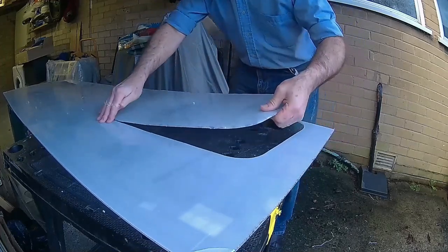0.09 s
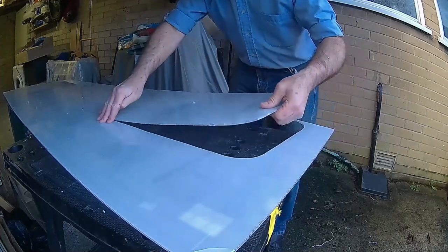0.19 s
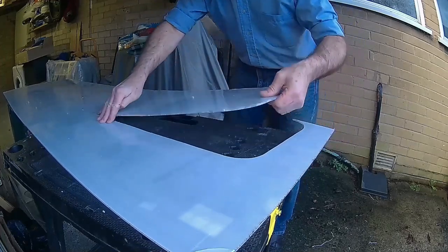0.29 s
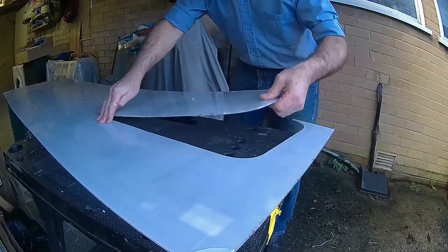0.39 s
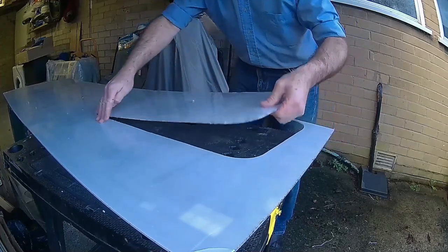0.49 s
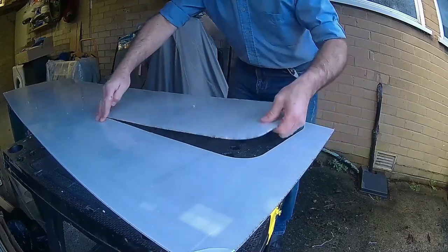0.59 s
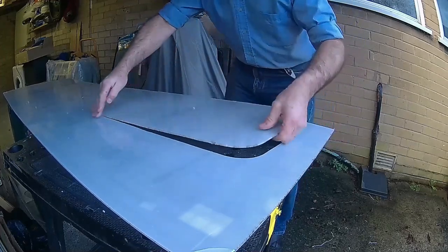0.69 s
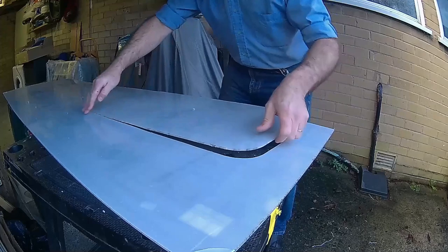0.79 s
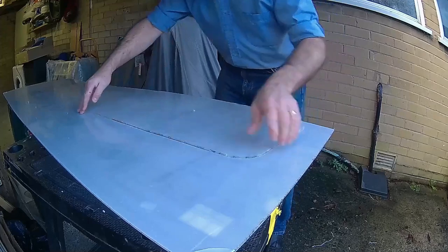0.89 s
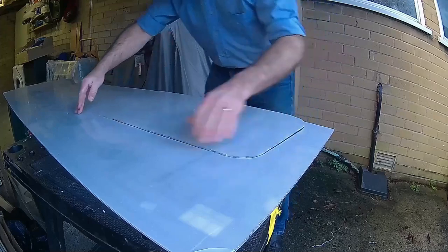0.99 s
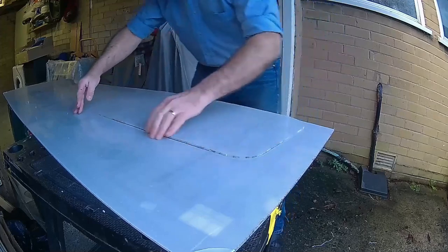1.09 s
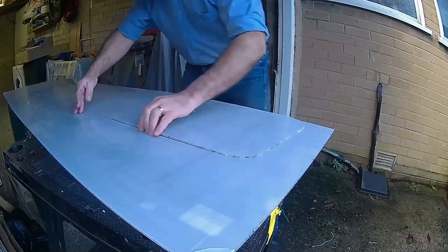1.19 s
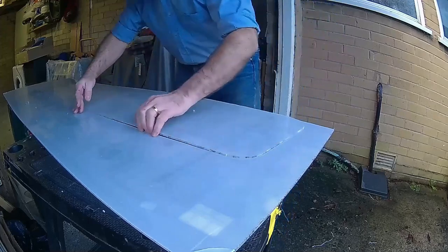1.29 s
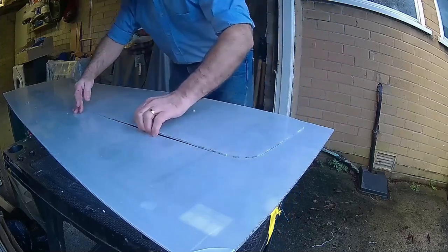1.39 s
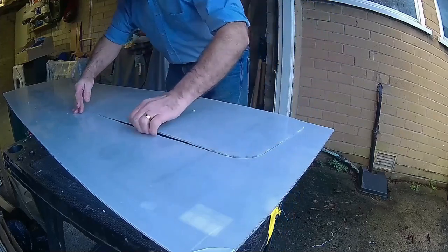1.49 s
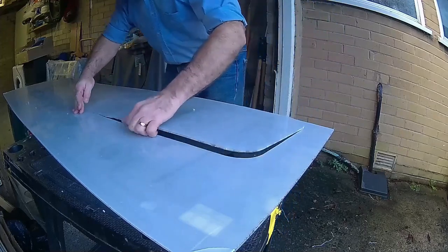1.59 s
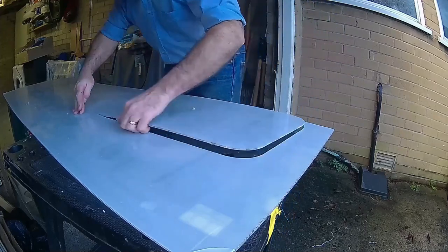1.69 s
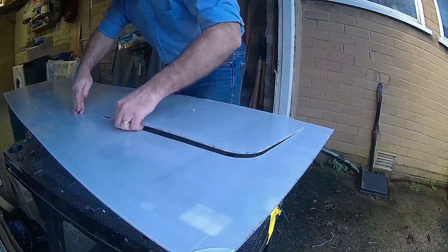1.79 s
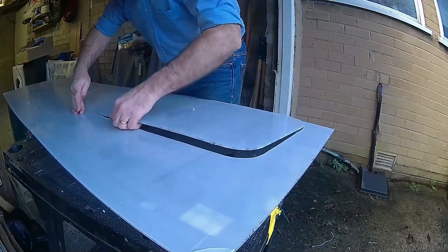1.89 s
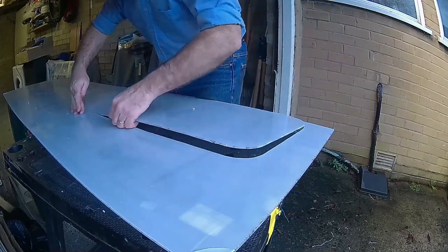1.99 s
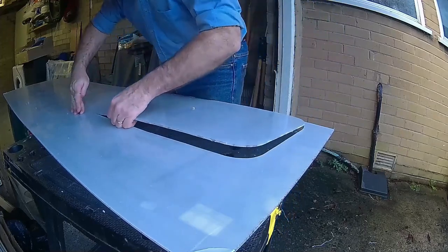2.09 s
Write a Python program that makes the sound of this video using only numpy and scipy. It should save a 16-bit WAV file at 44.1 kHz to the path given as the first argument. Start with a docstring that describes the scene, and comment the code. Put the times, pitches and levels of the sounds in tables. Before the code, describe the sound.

A stiff plastic sheet is flexed on a workbench in a walled yard. After near-quiet, a very loud, sharp crackling snap with hollow knocks bursts at 0.2 s, echoing briefly. Tiny ticks come near 0.57 s, a duller double knock at 0.9 s, weak knocks around 1.04 s, a small click at 1.5 s, then faint taps and rubbing, strongest around 1.63 s, over soft distant traffic and hiss.

```python
"""Plastic sheet flexed by hand on a workbench in a walled yard until its fused cut lets go.
Knocks: rattling contacts drive the sheet's dull modes. Cracks: showers of coloured splinter clicks.
Rubbing: friction clicks ring the sheet and scratch it. Bending: faint narrow-band hums.
The walls return a short tail of sparse echoes; distant traffic and hiss are patchy shaped noise.
The sound is nearly mono, with a faint random-phase side signal."""
import sys
import numpy as np
from scipy import signal
from scipy.io import wavfile
from scipy.ndimage import uniform_filter1d

SR = 44100
rng = np.random.default_rng(int(sys.argv[2]) if len(sys.argv) > 2 else 0)


def store_pcm(level_fs):
    """Save levels as 16-bit WAV."""
    pcm = np.round(np.clip(level_fs, -1, 1) * 32767).astype(np.int16)
    wavfile.write(sys.argv[1], SR, np.atleast_2d(pcm).T)


def gain_from_decibels(decibels):
    """Convert decibel values to linear amplitude factors."""
    exponent = np.asarray(decibels, float) / 20
    return 10 ** exponent


N = 94815  # 2.15 s

# rubbing by fingers and edges: t/s, rms in the sheet/dB, rms of the scratch/dB
RUBBING = [(0, -61.5, -78), (0.102, -72, -90), (0.502, -68, -80.5), (.56, -59, -69.5), (0.628, -71.5, -86),
           (0.761, -63, -78), (0.861, -66, -68.5), (1.0, -56.5, -80), (1.2, -64, -67), (1.3, -66.5, -86),
           (1.575, -73.5, -71), (1.63, -45.5, -66), (1.67, -56.5, -78), (1.72, -51.5, -65),
           (1.82, -58.5, -75), (1.872, -67.5, -72.5), (1.961, -52, -74), (2.15, -68.5, -94.5)]
# sheet modes: f/Hz, relative level/dB, t60/s
SHEET_MODES = [(93, -4, .15), (151, -42, .12), (240, 0, .08), (290, -6, .06), (384, 2.5, 0.072),
               (472.3, 1, .05), (560, -23, 0.036), (600, 8, 0.047), (657, 2.5, 0.028), (749, 14, 0.017),
               (860, 4, 0.04), (986.5, 14, 0.015), (1046, 2, 0.049), (1100, 11.5, 0.017), (1256, 15, 0.016),
               (1422, 10, .03), (1813, -6.5, 0.019), (2160, -18, .03), (2670, -17, .04), (2990, -17, 0.048),
               (3150, -20, .03)]
# distant traffic and hiss, relative density: f/Hz, level per Hz/dB
TRAFFIC_COLOUR = [(20, -9.5), (60, -4.5), (200, -0.5), (400, -3.5), (700, -4), (1100, -2.5), (1400, -20),
                  (1900, -25), (3000, -24), (5000, -26), (7300, -29.5), (8000, -20.5), (8600, -25.5),
                  (10000, -30), (12000, -35.5), (14000, -35.5), (16000, -50.5)]
# knocks of the sheet: t/s, level before KNOCK_DB/dB, ring centre f/Hz, contact decay constant/s
KNOCKS = [(.001, -38, 700, 0.0044), (.014, -38, 600, 0.0027), (.2015, -5, 980, 0.0031),
          (.207, -4, 653, 0.0057), (.215, -16.5, 533, 0.0078), (.2265, -13, 970, 0.0046),
          (.24, -13, 600, 0.0071), (.261, -41, 810, 0.0048), (.567, -43.5, 600, 0.011),
          (.586, -44.5, 860, 0.0034), (.764, -41.5, 820, .004), (.776, -62, 900, 0.0042),
          (.892, -12.5, 631, 0.002), (.906, -15.5, 630, 0.0068), (.924, -29, 895, 0.011),
          (.94, -41.5, 100, 0.0038), (.896, -23, 277, 0.0058), (.93, -24.5, 303, 0.011),
          (.21, -18.5, 305, 0.0036), (1.039, -32, 221, 0.0023), (1.092, -50, 110, 0.0059),
          (1.506, -40.5, 263, 0.014), (1.795, -40, 290, 0.007), (1.7815, -43.5, 2970, 0.0046),
          (1.5024, -40.5, 2880, 0.0048), (1.69, -44, 1810, 0.0097), (.896, -41.5, 2300, 0.0027),
          (1.025, -46, 2300, 0.0042), (1.043, -39, 2000, 0.0032), (.968, -30.5, 760, 0.0023),
          (1.037, -23, 600, 0.0034), (1.045, -28.5, 900, 0.0013), (1.063, -49, 560, 0.0059),
          (1.16, -39, 569, 0.0041), (1.183, -39, 1050, 0.0023), (1.195, -66, 1100, .006),
          (1.327, -40, 600, .003), (1.502, -24.5, 702, 0.0043), (1.518, -30.5, 710, 0.0027),
          (1.528, -57, 720, 0.0018), (1.586, -36.5, 400, 0.0053), (1.594, -32.5, 870, 0.0069),
          (1.607, -35, 687, 0.0072), (1.683, -43, 1300, 0.0092), (1.707, -41, 950, .005),
          (1.781, -35.5, 1100, 0.0034), (1.81, -44.5, 418, 0.0067), (1.915, -39, 540, 0.012),
          (2.067, -38.5, 716, 0.0018)]
# cracks along the cut: t/s, level before CRACK_DB/dB, brightness/0-1, decay constant/s
CRACKS = [(.001, -55, 0.86, 0.016), (0.2013, -10, 0.84, 0.0041), (0.2064, -11, 0.8, 0.012),
          (0.2258, -15, 0.71, 0.0023), (0.237, -44, .8, .004), (0.568, -52.5, .9, 0.0025),
          (0.584, -49, 0.85, 0.0027), (.648, -62, 0.85, 0.0033), (.89, -40.5, 0.47, 0.0047),
          (0.894, -29, .2, 0.0062), (0.908, -42, 0.44, 0.0035), (0.922, -42, 0.37, 0.0079),
          (.968, -41, .2, 0.013), (1.0232, -42, 0, 0.01), (1.046, -38, 0.07, 0.0038),
          (1.1835, -51, 0.07, 0.021), (1.256, -53.5, .05, 0.003), (1.331, -47, 0.5, 0.0034),
          (1.502, -32.5, 0.67, 0.0048), (1.514, -62, .6, 0.0033), (1.53, -64, 0.7, .003),
          (1.605, -45.5, 0.15, 0.031), (1.682, -44, 0.2, .008), (1.745, -48.5, .05, .005),
          (1.7814, -35.5, 0, 0.0058), (2.033, -48, 0.87, 0.0034)]
# dull crack and scratch, relative colour: f/Hz, level per Hz/dB
DULL_COLOUR = [(900, -37.5), (1500, -0.5), (2200, -3.5), (2850, 0), (3400, -12), (5000, -17), (7000, -29.5),
               (10000, -33), (12000, -53.5), (16000, -74)]
# bright crack, relative colour: f/Hz, level per Hz/dB
BRIGHT_COLOUR = [(880, 8), (1500, -9), (1830, -10), (2320, -11), (3380, -7.5), (3550, -14), (5070, -8.5),
                 (9100, -4), (13100, -24.5), (16000, -27)]
# yard decay, apart from the early boost: f/Hz, t60/s
YARD_DECAY = [(150, 0.26), (500, 0.15), (1200, 0.26), (3000, 0.22), (8000, 0.2), (12000, 0.16)]
# hums of the bent sheet: t/s, length/s, f/Hz, rms before the swell/dB
HUMS = [(1.08, 0.23, 232, -63.5), (1.54, 0.26, 155, -64.5), (1.928, 0.088, 425, -54)]
# side/mid gain, before frames overlap: f/Hz, level/dB
SIDE_GAIN = [(60, -32.5), (250, -34.5), (600, -34.5), (1500, -22), (3000, -15), (8000, -12.5),
             (15000, -28.5)]

SOFT_S, RADIATE_HZ = 0.00056, (94.4, 3800)  # softness of a tap, radiated band
RUB_PER_S, RUB_SPREAD_DB, RUB_HZ, RUB_OCT = 2200, 2.5, 600, 1.18  # clicks; centre and reach of the ring
TRAFFIC_DB, PATCH_DB = -60.5, 1.2  # overall rms; standard deviation of the patches
KNOCK_DB, KNOCK_RISE_S = -6, 0.0019
RING_OCT, RING_FLOOR_DB, SPOT_DB = 0.56, -35, 1.5  # reach around the centre, its floor, spread by spot
CRACK_DB, CRACK_RISE_S, DULL_BELOW_HZ = -5, 0.00056, 900
SPLINTERS_PER_S, SPLINTER_SPREAD_DB = 12000, 1.5
YARD_KNOCK_DB, YARD_CRACK_DB, YARD_GAP_S = -5.5, -3.5, 0.004
EARLY_DB, EARLY_S = 6.5, 0.041  # near walls strengthen the first echoes
HUM_POLE_HZ = 8.9  # bandwidth of each of two poles
EDGE_HZ = 16300


def evened(x):
    """Scales to rms 1."""
    return x / np.sqrt(np.mean(x ** 2) + 1e-20)


def read(points, hz):
    """Interpolates a table on a log-frequency axis."""
    f, value = np.transpose(points)
    return np.interp(np.log(hz + 1), np.log(f + 1), value)


def add(mix, at_s, sound):
    """Mixes a sound in at a time."""
    part = mix[round(at_s * SR):][:len(sound)]
    part += sound[:len(part)]


def levelled(sound, db, window):
    """Sets the loudest short-term rms to 3 dB below db."""
    loudest = uniform_filter1d(sound ** 2, window).max()
    return gain_from_decibels(db) * sound / np.sqrt(2 * loudest)


def clicks(per_s, spread_db, size):
    """Sparse clicks of random sign; a few are large."""
    happens = rng.random(size) < per_s / SR
    excess = np.minimum(rng.exponential(1, size), 4)
    sign = rng.choice([-1., 1.], size)
    return happens * sign * gain_from_decibels(spread_db * excess)


def kernel(db):
    """Minimum-phase response of energy 1 for a gain on 1025 bins."""
    mirrored_db = np.r_[db, db[-2:0:-1]]
    log_gain = np.log(gain_from_decibels(np.maximum(mirrored_db, -100)))
    h = np.fft.ifft(np.exp(np.conj(signal.hilbert(log_gain)))).real[:1024]
    return h / np.linalg.norm(h)


def ring(weight_db):
    """Decaying sheet modes of random phase, softened at onset and limited to the radiated band."""
    t = np.arange(6000) / SR
    hz, db, t60_s = np.transpose(SHEET_MODES)[:, :, None]
    decay = gain_from_decibels(db + weight_db[:, None] - 60 * t / t60_s)
    modes = decay * np.sin(2 * np.pi * (hz * t + rng.random(hz.shape)))
    soft_onset = 1 - np.exp(-(t / SOFT_S) ** 2)
    band = signal.butter(2, RADIATE_HZ, "bandpass", fs=SR, output="sos")
    return signal.sosfilt(band, modes.sum(0) * soft_onset)


def rubbing():
    """Friction clicks ring the sheet through four random responses and scratch its surface."""
    at_s, ring_db, scratch_db = np.transpose(RUBBING)
    t, hz = np.arange(N) / SR, np.fft.rfftfreq(2048, 1 / SR)
    weight_db = -6 * (np.log2(np.transpose(SHEET_MODES)[0] / RUB_HZ) / RUB_OCT) ** 2
    grit = clicks(RUB_PER_S, RUB_SPREAD_DB, size=(5, N))
    ringing = evened(sum(signal.fftconvolve(g, ring(weight_db))[:N] for g in grit[1:]))
    scratch = evened(signal.fftconvolve(grit[0], kernel(read(DULL_COLOUR, hz)))[:N])
    return ringing * gain_from_decibels(np.interp(t, at_s, ring_db)) + scratch * gain_from_decibels(np.interp(t, at_s, scratch_db))


def traffic():
    """Distant road noise and microphone hiss: shaped noise, patchy in time and frequency."""
    frames, hz = N // 256 + 5, np.fft.rfftfreq(1024, 1 / SR)
    real, imag, patches = rng.standard_normal((frames, 513, 3)).T
    patches = evened(uniform_filter1d(uniform_filter1d(patches, 10, 0), 10, 1))
    gain_db = read(TRAFFIC_COLOUR, hz)[:, None] + PATCH_DB * patches
    spectrum = (real + 1j * imag) * gain_from_decibels(gain_db)
    noise = signal.istft(spectrum, nperseg=1024, noverlap=768)[1][:N]
    return gain_from_decibels(TRAFFIC_DB) * evened(noise)


def knocks():
    """A short rattling contact drives the modes, most of all those near the knock's centre."""
    out, hz, t = np.zeros(N), np.transpose(SHEET_MODES)[0], np.arange(2000) / SR
    for at_s, db, centre_hz, decay_s in KNOCKS:
        weight_db = np.maximum(-6 * (np.log2(hz / centre_hz) / RING_OCT) ** 2, RING_FLOOR_DB)
        weight_db = weight_db + SPOT_DB * rng.standard_normal(len(hz))
        envelope = np.exp(-t / decay_s) * np.minimum(t / KNOCK_RISE_S, 1)
        contact = rng.standard_normal(len(t)) * envelope
        sound = signal.fftconvolve(contact, ring(weight_db))
        add(out, at_s, levelled(sound, db + KNOCK_DB, 200))
    return out


def cracks():
    """A dying shower of splinter clicks, coloured between dull and bright."""
    out, hz, t = np.zeros(N), np.fft.rfftfreq(2048, 1 / SR), np.arange(3000) / SR
    bass_cut_db = 18 * np.log2(np.clip(hz / DULL_BELOW_HZ, .01, 1))  # 18 dB per octave
    for at_s, db, bright, decay_s in CRACKS:
        envelope = np.exp(-t / decay_s) * np.minimum(t / CRACK_RISE_S, 1)
        shower = clicks(SPLINTERS_PER_S, SPLINTER_SPREAD_DB, size=len(t)) * envelope
        colour_db = bright * read(BRIGHT_COLOUR, hz) + (1 - bright) * read(DULL_COLOUR, hz)
        sound = signal.fftconvolve(shower, kernel(colour_db + bass_cut_db))
        add(out, at_s, levelled(sound, db + CRACK_DB, 100))
    return out


def yard(x):
    """Sparse echoes of random sign, each band dying at its own speed; three tails take turns."""
    out, turn = np.zeros(N), np.arange(N) / SR * 37
    for k in range(3):
        taps = np.zeros(SR // 2)
        slots = np.arange(round(YARD_GAP_S * SR), SR // 2 - 20, 20)  # one echo per 20 samples
        at = slots + rng.integers(0, 20, len(slots))
        taps[at] = rng.choice([-1., 1.], len(slots))
        hz, t, z = signal.stft(taps, SR, nperseg=256)
        decay_db = EARLY_DB * np.exp(-t / EARLY_S) - 60 * t / read(YARD_DECAY, hz)[:, None]
        tail = signal.istft(z * gain_from_decibels(decay_db), SR, nperseg=256)[1]
        share = np.sqrt(2 / 3) * np.cos(np.pi * (turn + k / 3))  # squares sum to 1
        out += signal.fftconvolve(x * share, tail / np.linalg.norm(tail))[:N]
    return out


def hums():
    """Narrow-band noise around a low tone: unsteady, swelling and fading."""
    out = np.zeros(N)
    r = np.exp(-np.pi * HUM_POLE_HZ / SR)
    for at_s, length_s, hz, db in HUMS:
        t = np.arange(0, length_s, 1 / SR)
        noise = rng.standard_normal((2, SR))
        a, b = signal.lfilter([1], np.convolve([1, -r], [1, -r]), noise)[:, -len(t):]
        tone = evened(a * np.sin(2 * np.pi * hz * t) + b * np.cos(2 * np.pi * hz * t))
        swell = np.sqrt(np.sin(np.pi * t / length_s))
        add(out, at_s, gain_from_decibels(db) * swell * tone)
    return out


def scene():
    """Sheet, echoes and background at one point, on two equal channels."""
    knocking, cracking = knocks(), cracks()
    echoes = yard(gain_from_decibels(YARD_KNOCK_DB) * knocking + gain_from_decibels(YARD_CRACK_DB) * cracking)
    mono = rubbing() + traffic() + knocking + cracking + echoes + hums()
    return np.array([mono, mono])


def band_limit(x):
    """A steep low-pass at the top of the band."""
    return signal.sosfilt(signal.butter(12, 16660, fs=SR, output="sos"), x)


def record(dry):
    """Adds a faint random-phase side signal, opposite in the two channels; a lowpass limits the band."""
    hz, t, z = signal.stft(dry[0], SR, nperseg=512)
    phase = 2 * np.pi * rng.random(z.shape)
    z = z * gain_from_decibels(read(SIDE_GAIN, hz))[:, None] * np.exp(1j * phase)
    side = signal.istft(z, SR, nperseg=512)[1][:N]
    both = dry + np.array([side, -side])
    lowpass = signal.firwin(255, EDGE_HZ, window=("kaiser", 9), fs=SR)
    both = signal.oaconvolve(both, lowpass[None], "same")
    return band_limit(both)


dry = scene()
out = record(dry)
store_pcm(out)
```